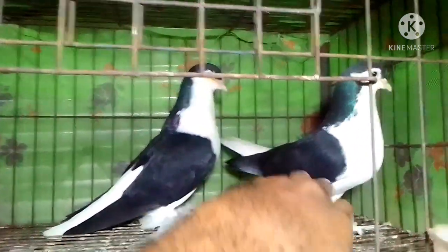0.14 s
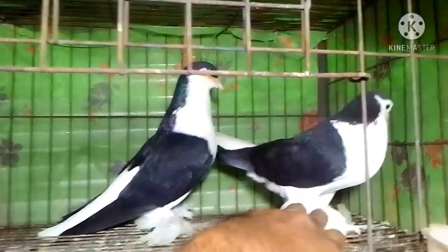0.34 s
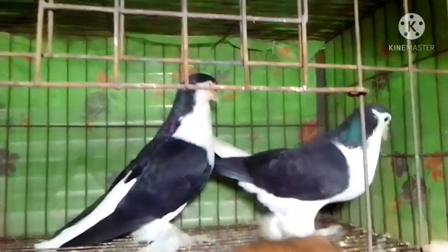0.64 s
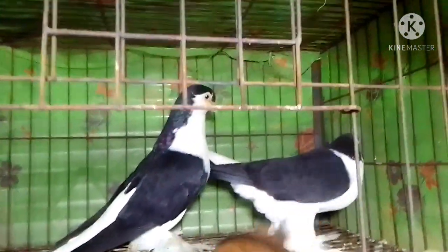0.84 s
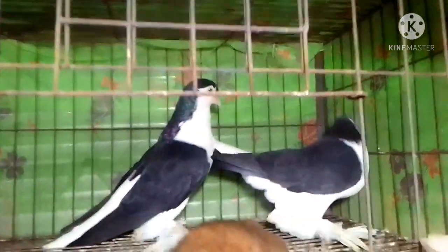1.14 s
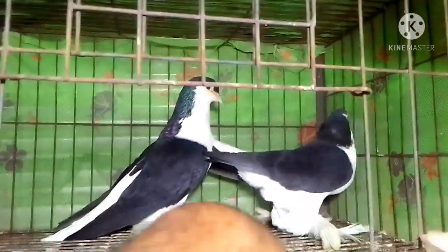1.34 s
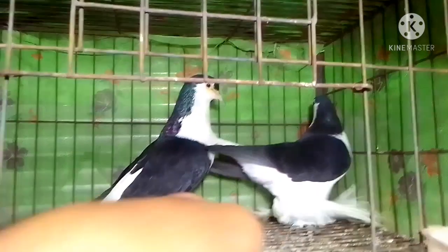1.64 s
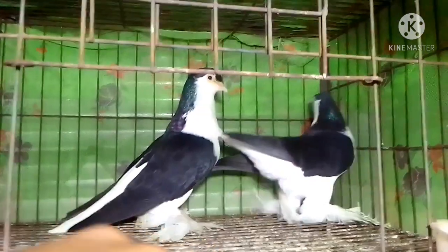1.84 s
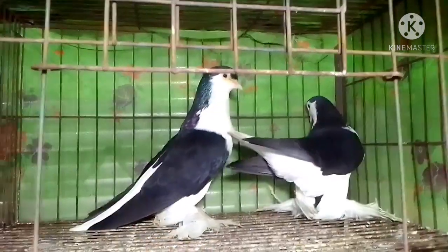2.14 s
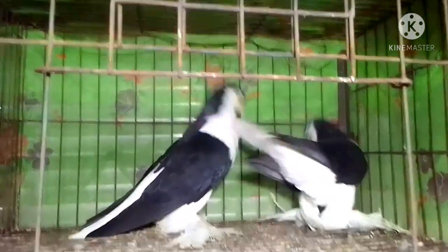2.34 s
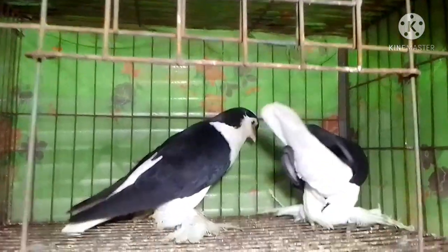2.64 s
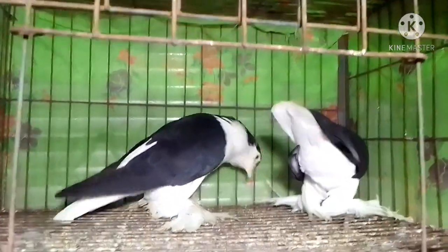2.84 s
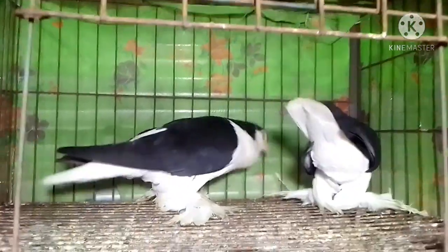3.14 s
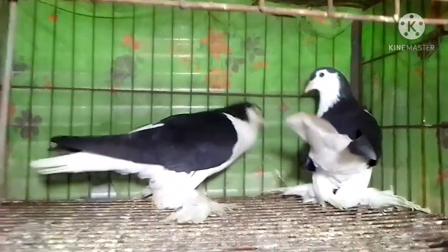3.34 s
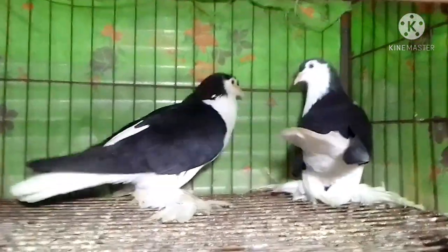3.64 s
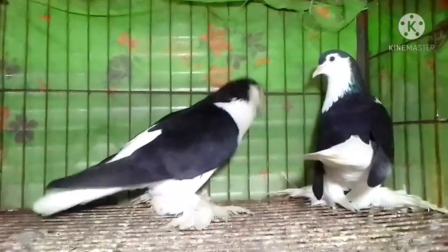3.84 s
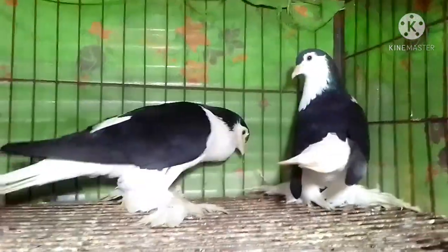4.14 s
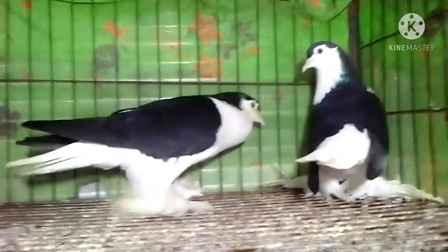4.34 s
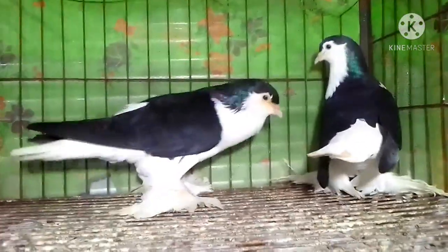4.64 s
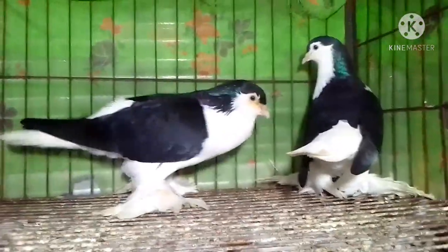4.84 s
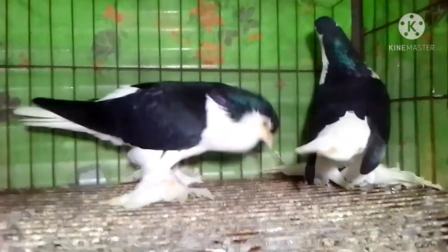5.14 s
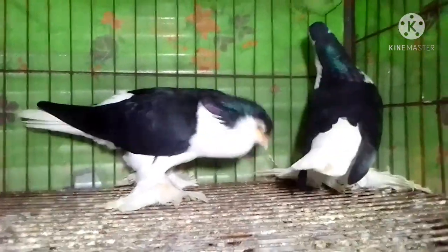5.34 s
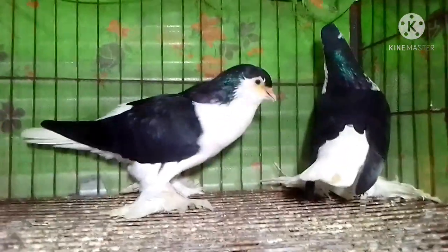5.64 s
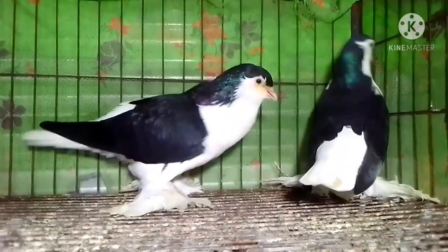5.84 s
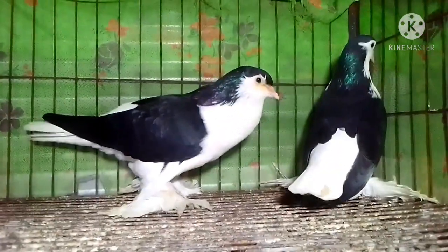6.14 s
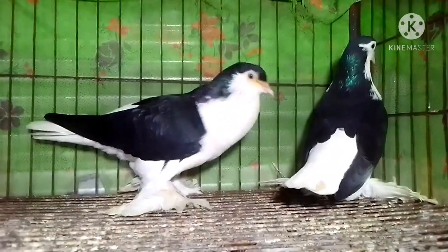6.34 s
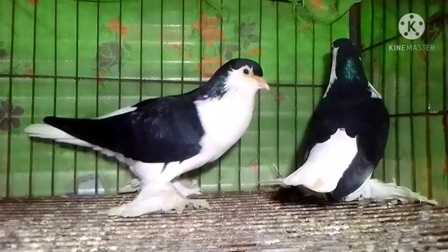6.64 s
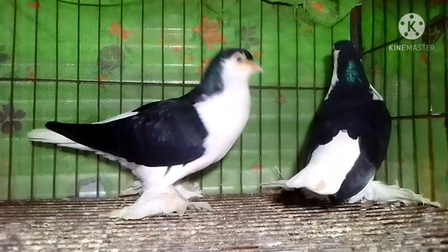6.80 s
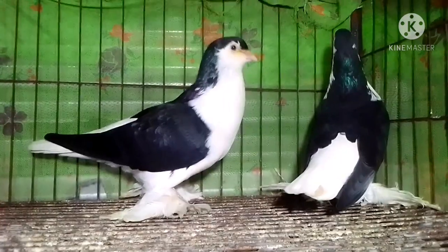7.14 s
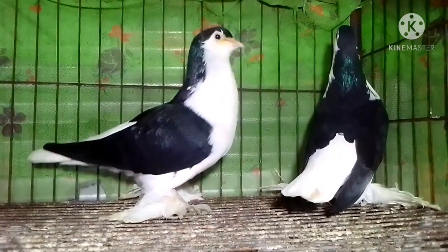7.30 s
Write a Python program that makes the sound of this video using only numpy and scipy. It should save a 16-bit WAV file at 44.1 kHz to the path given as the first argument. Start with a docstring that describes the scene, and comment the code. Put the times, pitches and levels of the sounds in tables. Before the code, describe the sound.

Two pigeons in a cage coo close to a phone microphone, nearly dry. Low gliding tones break into quick throbs and rough, bubbling gurgles, phrase after phrase with brief softer gaps. A smaller bird further away gives thin twitters early, then several rising, slightly buzzy chirps with a roomy echo. Soft hiss and a faint low electrical hum lie behind.

```python
"""Two pigeons court close to a phone, cooing phrase after phrase.
Each coo is a gliding, almost pure tone that breaks into short throbs; two unsteady tones in the
swollen crop make a rough gurgle, and shaped noise adds a rasp.
A small bird further off chirps with arched tones and twitters in runs of falling pips.
Behind them lie a soft hiss made of coloured noise, a faint passing whine and a mains hum."""
import sys
import numpy as np
from scipy import signal
from scipy.io import wavfile
from scipy.ndimage import uniform_filter1d

SR = 44100
rng = np.random.default_rng(int(sys.argv[2]) if len(sys.argv) > 2 else 0)


def digitize_waveform(pressure):
    """Quantize a signal to 16-bit integers and store it at the path in sys.argv[1].

    Rows of a 2-D input are taken as channels; values are limited to [-1, 1].
    """
    field = np.atleast_2d(pressure).T
    bounded = np.clip(field, -1, 1)
    quanta = np.round(bounded * 32767).astype(np.int16)
    wavfile.write(sys.argv[1], SR, quanta)


N = 329427
TIME = np.arange(N) / SR


def undb(db):
    """Turn decibels into a gain."""
    return 10 ** (np.asarray(db) / 20)


def unit(x):
    """Scale a signal to an rms (average strength) of 1."""
    return x / np.sqrt(np.mean(x ** 2))


def band(x, low_hz, high_hz, order=3):
    """Keep the pitches between two edges; filtering forwards and backwards avoids any delay."""
    sos = signal.butter(order, [low_hz, high_hz], "band", fs=SR, output="sos")
    return signal.sosfiltfilt(sos, x, padtype=None)


def waver(rate_hz):
    """Random wavering around a rate, with a spread of 1."""
    return unit(band(rng.standard_normal(N), rate_hz / 2, rate_hz * np.sqrt(2), order=1))


def swell(t, length):
    """Smooth bump around t = 0, above half height for the given length."""
    return np.cos(np.pi / 2 * np.clip(t / length, -1, 1)) ** 2


def cycles(hz):
    """Phase of an oscillator that follows a changing pitch."""
    return 2 * np.pi * np.cumsum(hz) / SR


def note(start, length, fade_s):
    """Samples that a note covers, seconds since its start (held at both ends) and its fade in and out."""
    part = slice(max(int((start - fade_s) * SR), 0), int((start + length + fade_s) * SR))
    t = TIME[part] - start
    held = np.clip(t, 0, length)
    return part, held, swell(t - held, fade_s)


def add_burst(out, peak_s, gain, hz, length, phase, glide_hz_per_s, skew=.15):
    """Add a short gliding tone that rises faster than it fades; hz is its pitch at the peak."""
    part = slice(max(int((peak_s - length) * SR), 0), int((peak_s + 2 * length) * SR))
    t = TIME[part] - peak_s
    shape = swell(t, length * (1 + skew * np.sign(t)))
    out[part] += gain * shape * np.cos(phase + 2 * np.pi * (hz + glide_hz_per_s * t / 2) * t)


def room(x, t60, wet_db):
    """Direct sound plus a dense noisy tail from the walls, which falls by 60 dB in t60 seconds."""
    t = TIME[:SR // 2]
    tail = rng.standard_normal(len(t)) * undb(-60 * t / t60)
    tail = tail * (1 - swell(t, 0.0014))  # the echoes set in just after the direct sound
    return x + undb(wet_db) * signal.fftconvolve(x, tail / np.linalg.norm(tail))[:N]


def background(turn_s=5.66, half_turn_s=0.59, sweep_db=7, sweep_width_hz=520, from_hz=4600, to_hz=3200,
               patchy=1.6, hiss_db=-59, whine_db=-72, hum_hz=100.9, hum_db=-69):
    """Noise coloured pitch by pitch, with a patchy bright band that slides down; a whine and a mains hum."""
    # Colour of the soft hiss. Each row: pitch in Hz, relative strength in dB.
    hiss_colour = [(30, -21), (80, -9), (160, -7.5), (400, 10), (750, -1.5), (1850, -6.7), (2750, 1.5),
                   (3600, -6), (4400, 1.5), (5300, 2.5), (6200, -19), (7100, -17), (9000, -28),
                   (15000, -23.5)]
    # How that colour has shifted once it has turned. Each row: pitch in Hz, change in dB.
    hiss_change = [(2600, -1), (3400, 7.5), (4400, -1.5), (5250, -9.5), (6300, 13), (7400, 4.5),
                   (10500, 0.5)]

    # split the noise into cells of pitch and time
    hz, s, cells = signal.stft(rng.standard_normal(N), SR, nperseg=2048)

    def curve(rows):
        """Join the rows by straight lines over the logarithm of pitch."""
        rows = np.array(rows)
        return np.interp(np.log(hz + 1), np.log(rows[:, 0]), rows[:, 1])[:, None]

    turn = np.clip(.5 + (s - turn_s) / (2 * half_turn_s), 0, 1)
    centre_hz = from_hz + (to_hz - from_hz) * turn
    slide = np.exp(-((hz[:, None] - centre_hz) / sweep_width_hz) ** 2)
    patches = uniform_filter1d(rng.standard_normal(cells.shape), size=8, axis=0)
    slide = slide + patchy * slide * patches
    # the bright band comes and goes around 5.75 s
    db = curve(hiss_colour) + curve(hiss_change) * turn + sweep_db * slide * swell(s - 5.75, 0.89)
    hiss = unit(signal.istft(cells * undb(db), SR)[1][:N]) * undb(hiss_db)

    whine = undb(whine_db) * swell(TIME - 2.25, 1.3) * unit(band(rng.standard_normal(N), 2080, 2280))
    hum = undb(hum_db) * (1 + .27 * waver(18)) * np.sin(2 * np.pi * hum_hz * TIME)
    return hiss + whine + hum


def rolling(attack_s=.012, release_s=.035):
    """Air pressure (as a gain), crop resonance and pitch scatter; the strongest roll sets all three."""
    # Rough rolls of the voices. Each row: start in seconds, length in seconds, crop resonance in Hz,
    # starting level in dB, level change in dB, pitch scatter as a share of the pitch.
    rolls = [(.02, .54, 335, -44, -5, .15), (1.05, .33, 305, -54, 0.5, 0.19),
             (1.415, 0.028, 328, -48.5, 6, 0.17), (1.494, 0.062, 350, -38, -8.5, 0.18),
             (1.678, 0.14, 385, -44, -1, .16), (1.833, 0.092, 368, -36, -4, 0.2),
             (2.0, 0.31, 330, -45.5, 0.5, 0.23), (2.3, 0.22, 360, -39, -0.5, 0.16),
             (2.56, .185, 335, -36, -1, .27), (2.787, 0.29, 325, -40, -1.5, 0.083),
             (3.126, 0.18, 323, -39.5, -5, 0.11), (3.336, 0.14, 306, -39, -2.5, 0.092),
             (3.5, 0.22, 324, -44, 0.5, 0.19), (3.79, .22, 333, -47, 11, .27),
             (4.03, 0.46, 345, -41.5, 3, 0.15), (4.552, 0.23, 335, -39, -10, .19),
             (5.02, 0.18, 326, -59, 8.5, 0.18), (5.248, 0.43, 289, -46, -5, .16),
             (5.747, 0.038, 446, -40.5, -11, 0.094), (5.83, 0.035, 406, -41, -11.5, 0.11),
             (5.995, .22, 365, -44, 8, 0.19), (6.24, .24, 331, -44.5, -0.5, 0.23),
             (6.508, .28, 355, -41, 0, .19), (6.812, 0.038, 363, -34.5, -2, 0.21),
             (6.892, 0.098, 355, -45, 3.5, 0.24), (7.04, 0.15, 313, -39.5, -11.5, 0.097),
             (7.172, .3, 306, -45.5, 5.5, 0.095)]
    pressure, crop_hz, scatter = np.zeros(N), np.full(N, float(rolls[0][2])), np.zeros(N)
    for start, length, hz, db, change_db, spread in rolls:
        t = TIME - start
        attack = swell(np.minimum(t, 0), attack_s)
        level = undb(db + change_db * np.clip(t / length, 0, 1))
        # after its length a roll falls by a factor e in every release time
        gain = attack * level * np.exp(-np.maximum(t - length, 0) / release_s)
        leads = gain > pressure
        pressure[leads], crop_hz[leads], scatter[leads] = gain[leads], hz, spread
    return pressure, crop_hz, scatter


def gurgle(wander_hz=17, wander=.75, jitter=.05, jitter_hz=110, trade_db=5.5, low_hz=212, high_hz=540,
           overtone_db=-28, beat_hz=52, beat_depth=.28):
    """The two sides of the syrinx sing unsteady strands around the crop resonance, trading the lead."""
    pressure, crop_hz, scatter = rolling()
    strands = 0
    for side in (-1, 1):  # one strand tends below the resonance, the other above
        offset = scatter * (.8 * side + wander * waver(wander_hz))
        hz = crop_hz * np.exp(offset + jitter * waver(jitter_hz))
        strands = strands + undb(trade_db * waver(wander_hz)) * np.sin(cycles(hz))
    strands = band(strands, low_hz, high_hz)
    # even out the strength, so that air pressure sets the loudness
    voice = strands / np.sqrt(uniform_filter1d(strands ** 2, size=SR // 35) + 1e-9)
    # lopsided swings add weak overtones
    voice = voice + undb(overtone_db) * band(voice ** 2, 630, 640, order=2)
    # the throat chops the sound into uneven beats
    beat_phase = cycles(beat_hz * np.exp(.35 * waver(wander_hz)))
    beats = unit(1 + beat_depth * np.sin(beat_phase))
    return voice * beats * pressure


def rasps(grain_hz=45, grain_db=3, throat_hz=570, throat_db=6.5):
    """Grainy noise over the hardest pressed coos, strongest at the throat resonance."""
    # Rasps. Each row: middle in seconds, length at half height in seconds,
    # level in dB before the grain, upper edge in Hz.
    rasp_rows = [(0.333, 0.3, -58.5, 850), (2.136, 0.24, -60, 1150), (2.624, 0.39, -58.5, 1180),
                 (4.47, 0.23, -55, 1340), (6.305, 0.39, -57.5, 820)]
    out = 0
    for middle, length, db, edge_hz in rasp_rows:
        noise = band(rng.standard_normal(N), 360, edge_hz, order=4)
        noise = noise + undb(throat_db) * signal.lfilter(*signal.iirpeak(throat_hz, 5, SR), noise)
        out = out + undb(db) * swell(TIME - middle, length) * unit(noise)
    return out * undb(grain_db * waver(grain_hz))


def coos(flutter_hz=52, octave_db=-3, low_hz=555, high_hz=655, undertone_ratio=.68,
         slide_power=1.663, peak_share=.35, ends_db=-2, fade_s=.026):
    """The syrinx sings a sliding, fluttering tone; a narrow resonance near 600 Hz lets out the octave of strong
    tones."""
    # Sung notes, and at 4.434 s the ringing octave of the strong note just before.
    # Each row: start in seconds, length in seconds, first pitch in Hz, last pitch in Hz,
    # peak level in dB before the flutter, flutter from 0 to 1, undertone share from 0 to 1.
    coo_tones = [(0.071, 0.026, 412.5, 374, -34.5, 0.36, 0.13), (.338, .09, 350.4, 302, -26.5, 0.3, 0),
                 (1.087, 0.3, 260.6, 254.6, -44.5, 0.3, 0), (1.88, .335, 414, 343, -36.5, 0.03, 0.13),
                 (2.272, 0.17, 408, 383, -35, 0.14, 0.23), (2.503, 0.061, 324.5, 283, -25, 0.25, 0),
                 (3.869, .32, 411.7, 335, -36.5, 0, 0.23), (4.38, .136, 332, 300, -23, 0.23, 0),
                 (4.434, 0.082, 592, 614, -45.5, 0.2, 0), (4.915, 0.078, 607, 656, -56.5, .54, 0.8),
                 (6.033, .18, 292, 336.4, -33, 0.26, 0.04), (6.265, .215, 416, 372, -30.5, 0.23, 0.22),
                 (7.2, 0.17, 337.4, 286.5, -34, 0.16, 0), (7.398, 0.079, 304, 290, -28, .02, 0)]
    tone, octave = np.zeros(N), np.zeros(N)
    wobble = .009 * waver(25)
    flutter = np.sin(cycles(flutter_hz * (1 + 0.29 * waver(19.5))))
    stray = cycles(14 * waver(22.58))  # makes the undertone unsteady
    for start, length, first_hz, last_hz, db, depth, under in coo_tones:
        part, t, fade = note(start, length, fade_s)
        gone = t / length
        # the pitch holds at first and slides late
        hz = first_hz + (last_hz - first_hz) * gone ** slide_power
        phase = cycles(hz * (1 + wobble[part]))
        # loudest at a share of the length, weaker at both ends
        slack = np.interp(gone, [0, peak_share, 1], [1, 0, 1]) ** 2
        gain = undb(db + ends_db * slack) * fade * (1 + depth * flutter[part])
        undertone = under * np.sin(undertone_ratio * phase + stray[part])
        tone[part] += gain * (np.sin(phase) + undertone)
        octave[part] += gain ** 2 * np.sin(2 * phase)  # grows faster than the tone itself
    return tone + undb(octave_db) * band(octave, low_hz, high_hz, order=1)


def throbs(glide_hz_per_s=-300):
    """The tone chokes and restarts in opposite phase, so a run of throbs splits its line in two."""
    # Throbs of the throat. Each row: first peak in seconds, peak level in dB, pitch in Hz, length at
    # half height in seconds; for a run also number of throbs, spacing in seconds.
    throb_rows = [(.128, -23.5, 353, .014, 4, .0135), (.19, -23, 350, .014, 2, .0165),
                  (.229, -23, 347.5, .015, 5, .017), (1.61, -34.5, 425, .016, 2, .027),
                  (1.766, -30.5, 393, .023), (1.979, -25, 311, .023), (2.093, -29.5, 299, .021),
                  (2.431, -21.5, 337, .016, 3, .0197), (2.592, -29, 320, .011, 2, .023),
                  (3.439, -29.5, 309, .011), (3.709, -35, 296, .018, 2, .048),
                  (3.814, -23.5, 310, .022, 2, .1), (4.265, -21, 328, .018),
                  (4.333, -22.5, 320, .014, 3, .0205), (4.823, -41, 325, .01, 2, .048),
                  (4.932, -38, 385, .012, 2, .078), (5.09, -45, 660, .006),
                  (5.289, -37, 296, .013, 6, .0349), (5.58, -35.5, 254, .011, 2, .042),
                  (5.75, -41, 465, .01), (5.825, -33.5, 375, .007), (6.507, -31, 378, .011, 5, .0165),
                  (6.594, -29, 350, .014), (6.668, -30, 420, .01, 2, .073),
                  (6.888, -27, 316, .015, 2, .137), (6.945, -23.5, 335, .0077)]
    out = np.zeros(N)
    for start, db, hz, length, *run in throb_rows:
        count, spacing = run or (1, 0)
        for k in range(round(count)):
            after = k * spacing + .001 * rng.standard_normal()  # slightly uneven timing
            phase = np.pi * k + 2 * np.pi * hz * after
            add_burst(out, start + after, undb(db), hz, length, phase, glide_hz_per_s)
    return out


def small_bird(drop_share=1.0, sag_s=.0333, fall_s=.026, swell_db=5, ends_db=-11,
               pip_s=.016, pip_spacing_s=.022, pip_glide_hz_per_s=-22000, pip_detune=.01):
    """Slightly buzzy chirps that scoop up, may sag and drop back, and quick runs of falling pips."""
    # Chirps. Each row: start in seconds, length in seconds, rise time in seconds, top pitch in Hz,
    # level in dB before the swell and buzz, scoop as a share of the pitch,
    # mid-note sag as a share of the pitch, roughness from 0 to 1.
    chirps = [(2.141, .148, .055, 3715, -46, .17, .042, .7), (2.507, .05, .024, 3355, -49.5, .09, 0, 1),
              (2.998, .1, .042, 3920, -50.5, .1, 0, .9), (3.325, .13, .095, 4230, -46.5, .15, .006, .75),
              (3.737, .123, .027, 4314, -45, .17, .026, .27), (5.534, .24, .18, 4100, -64.5, .21, 0, 1),
              (6.835, .08, .052, 4210, -54.5, .12, 0, .2)]
    # Thin twitters. Each row: first pip's peak in seconds, number of pips, pitch in Hz,
    # typical peak level in dB before the buzz.
    twitters = [(.667, 3, 4600, -56), (.822, 3, 4910, -56), (.915, 4, 4880, -56), (1.052, 4, 4770, -55),
                (1.212, 3, 4840, -57), (6.08, 10, 3280, -65)]
    out = np.zeros(N)
    wobble = .026 * waver(170)
    buzz = undb(2.5 * waver(90))
    for start, length, rise_s, top_hz, db, scoop, sag, rough in chirps:
        part, t, fade = note(start, length, fade_s=0.005)
        rise = np.maximum(1 - t / rise_s, 0) ** 2
        drop = np.maximum(1 - (length - t) / fall_s, 0) ** 2
        below = rise + drop_share * drop  # how far the pitch is from its top
        middle = swell(t - (rise_s + length - fall_s) / 2, sag_s)
        phase = cycles(top_hz * (1 - scoop * below - sag * middle) * (1 + rough * wobble[part]))
        # a chirp grows louder as it goes, and is weaker off its top pitch
        gain = undb(db + ends_db * below + swell_db * (t / length - .5))
        out[part] += gain * fade * np.sin(phase)
    for start, count, hz, db in twitters:
        for k in range(round(count)):
            size_db, detune = rng.standard_normal(2)
            pip_hz = hz * (1 + pip_detune * detune)
            add_burst(out, start + k * pip_spacing_s, undb(db + size_db), pip_hz, pip_s, 0,
                      pip_glide_hz_per_s)
    return out * buzz


def walls(x, ring_hz=3520, ring_db=-3):
    """The small bird's room echoes most strongly in one narrow band."""
    ring = signal.lfilter(*signal.iirpeak(ring_hz, 8, SR), x)
    ring_echo = room(ring, t60=0.8, wet_db=-4) - ring
    return room(x, t60=0.5, wet_db=-8.5) + undb(ring_db) * ring_echo


def scene():
    """Near pigeons with nothing below about 180 Hz, almost dry; a more distant small bird; the background."""
    no_bass = signal.butter(4, 183, "high", fs=SR, output="sos")
    voices = signal.sosfiltfilt(no_bass, coos() + throbs() + gurgle() + rasps())
    pigeons = room(voices, t60=.35, wet_db=-15)
    return (pigeons + walls(small_bird()) + background())[None]


def record(dry, threshold_db=-52, duck_db=-6, average_s=0.1, top_hz=15500):
    """The phone's noise suppressor turns the bass down whenever the scene is quiet; the top is cut."""
    bass = signal.sosfiltfilt(signal.butter(4, 190, fs=SR, output="sos"), dry, padtype=None)
    power = uniform_filter1d(dry ** 2, size=int(average_s * SR))
    quiet = 1 / (1 + (power / undb(threshold_db) ** 2) ** 2)  # near 1 when quiet, near 0 when loud
    out = dry + bass * (undb(duck_db * quiet) - 1)
    return signal.sosfilt(signal.ellip(8, .2, 70, top_hz, fs=SR, output="sos"), out)


dry = scene()
out = record(dry)
digitize_waveform(out)
```